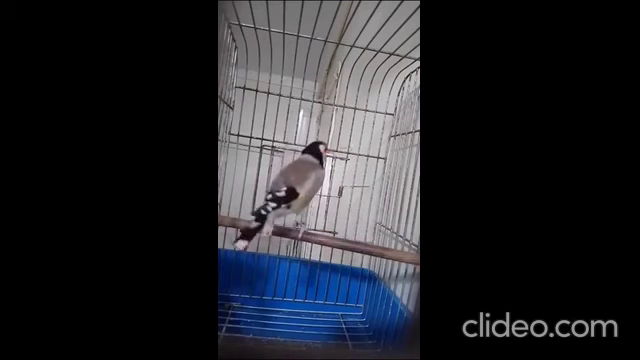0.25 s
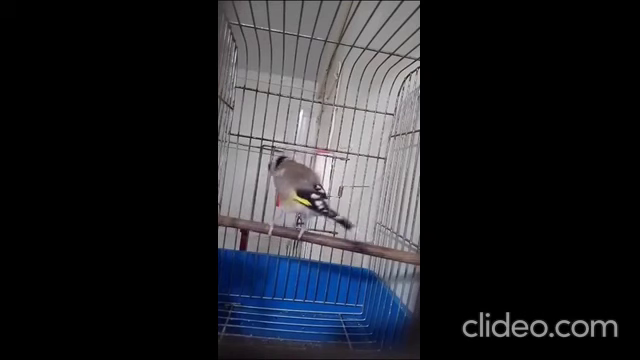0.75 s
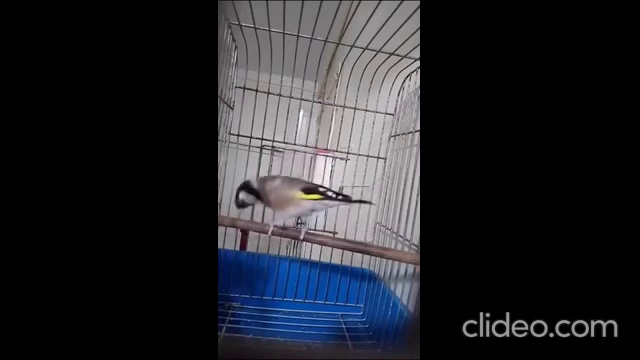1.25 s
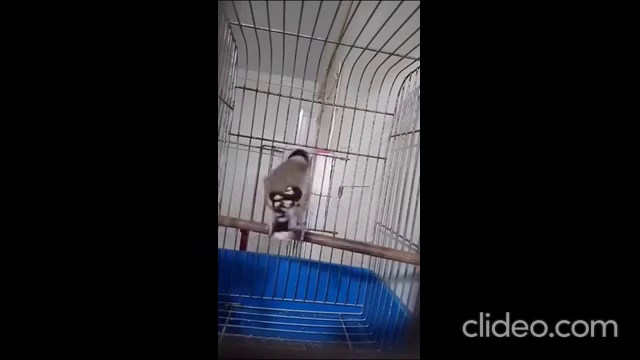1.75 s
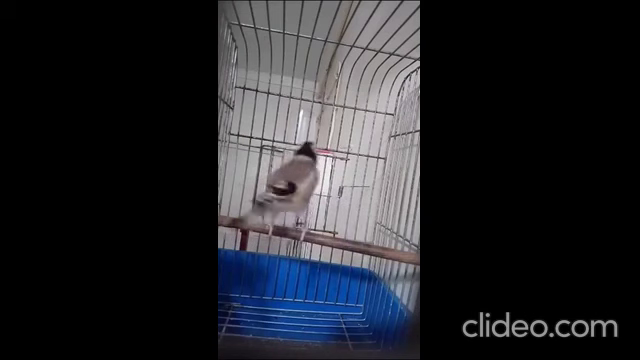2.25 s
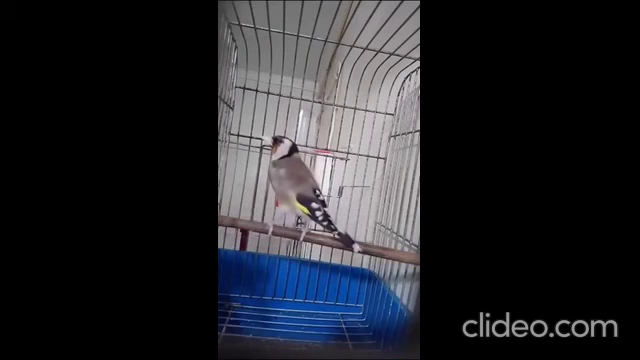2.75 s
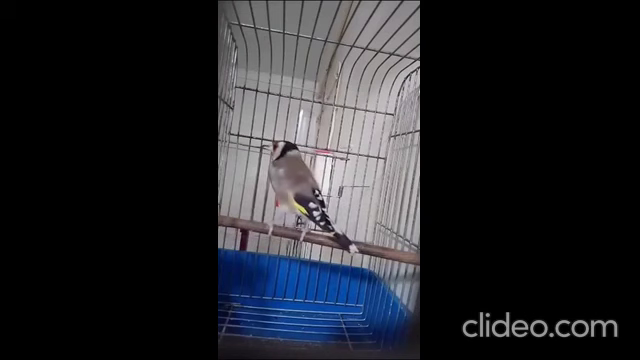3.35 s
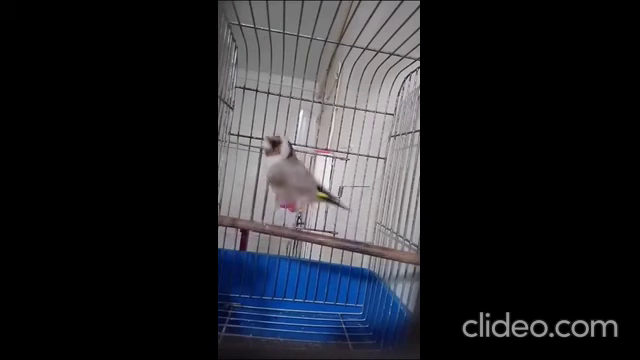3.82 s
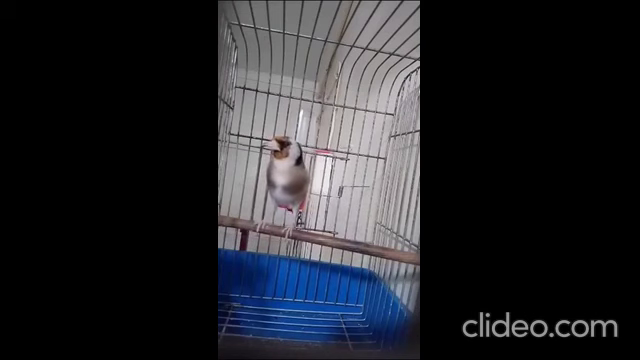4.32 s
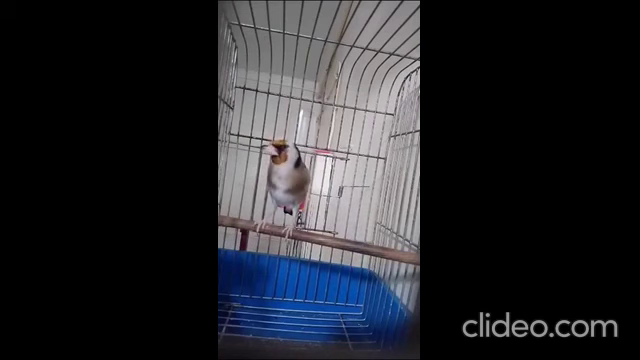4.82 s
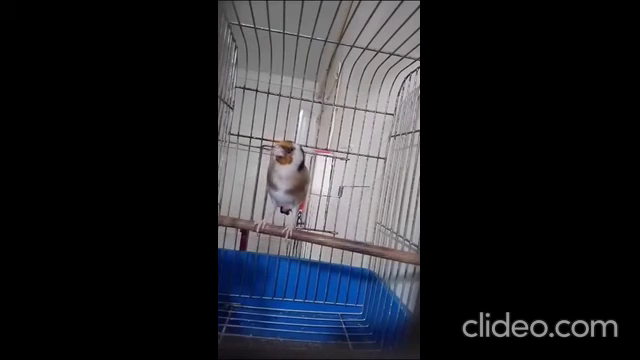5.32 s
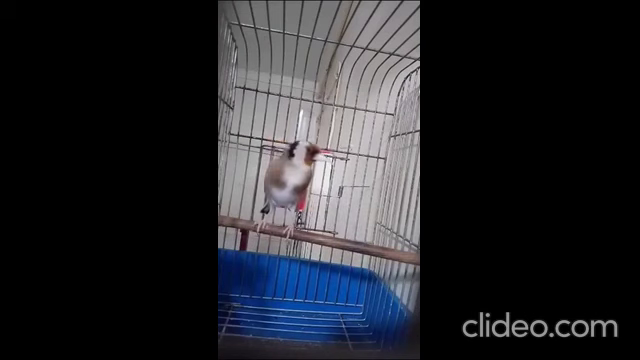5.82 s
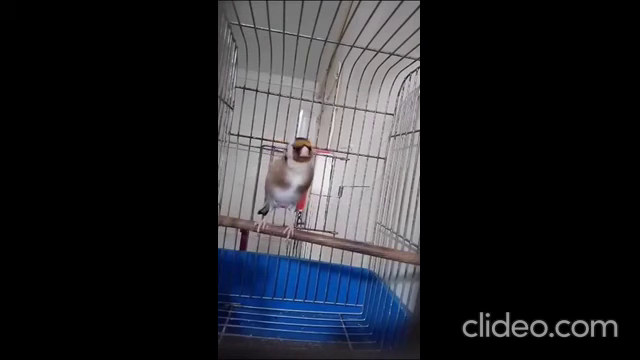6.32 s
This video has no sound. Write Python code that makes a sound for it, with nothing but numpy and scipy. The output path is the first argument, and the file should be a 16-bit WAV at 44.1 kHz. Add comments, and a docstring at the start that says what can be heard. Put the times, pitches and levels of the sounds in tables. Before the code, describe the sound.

A small caged songbird, close to the microphone, makes light taps on its perch and then gives a single short, piercing burst of song that rings in the room. A second finch further away twitters softly before it and more busily afterwards, washed in echo. The birds then fall quiet, leaving gentle rustles, faint dull bumps and a low indoor hum with a little hiss.

```python
"""Caged goldfinch in a bare room

Close to the microphone, a goldfinch sings a sharp phrase with both sides of its syrinx; the room rings.
Further off a second finch twitters softly, reaching the microphone mostly as echo.
The near bird taps its perch and shuffles, shaking the cage; soft rustles come and go over a faint hum."""
import sys
import numpy as np
from scipy import signal
from scipy.fft import rfft, irfft, next_fast_len
from scipy.io import wavfile
from scipy.ndimage import uniform_filter1d

SR = 44100
rng = np.random.default_rng(int(sys.argv[2]) if len(sys.argv) > 2 else 0)


def wrap_up_sound(samples):
    """Save the sound to the file named by the first command line argument, as 16-bit audio."""
    columns = np.atleast_2d(samples).T
    # keep every value between -1 and 1, then stretch to whole-number steps
    tamed = np.clip(columns, -1, 1)
    steps = np.round(tamed * 32767).astype(np.int16)
    wavfile.write(sys.argv[1], SR, steps)


N = 289737
LEAD = SR  # samples of run-up, so the room is already ringing at time 0
TIME = np.arange(-LEAD, N) / SR
ROOM_T60_S = 0.61

# near finch, each side of the syrinx, one list per syllable: (time [s], pitch [Hz], level [dB])
LOW_SYLLABLES = [
    [(2.035, 1845, -52), (2.068, 2270, -38.5), (2.086, 2500, -20.5), (2.095, 2580, -17.5),
     (2.115, 2816, -35.5), (2.15, 3106, -26), (2.185, 3395, -19), (2.196, 3550, -52)],
    [(2.458, 2656, -53), (2.47, 2430, -34), (2.485, 2178, -31.5), (2.494, 2090, -32), (2.5, 2040, -65)],
]
HIGH_SYLLABLES = [
    [(1.923, 5580, -31), (1.9255, 5070, -20.5), (1.928, 3410, -16.5), (1.9315, 4440, -17.5),
     (1.9375, 4892, -14), (1.943, 5080, -25.5)],
    [(2.136, 3340, -41.5), (2.143, 3560, -27), (2.16, 4040, -20), (2.195, 4595, -28.5)],
    [(2.228, 4028, -33), (2.24, 4337, -9), (2.247, 4614, -21), (2.283, 3890, -26), (2.303, 3619, -15),
     (2.325, 3513, -11.5), (2.345, 3484, -13), (2.37, 3509, -22), (2.45, 3537, -26.5), (2.465, 3530, -70)],
    [(2.468, 3557, -38), (2.487, 3393, -29.5), (2.497, 3210, -16), (2.506, 2955, -13), (2.516, 2635, -20),
     (2.528, 2290, -28)],
]
# each side's second harmonic against its fundamental, before colouring: (time [s], level [dB])
LOW_SECOND_HARMONIC = [(2.1, -26), (2.15, -21.5), (2.19, -35.5), (2.467, -7.5), (2.486, 5.5)]
HIGH_SECOND_HARMONIC = [(1.941, -37.5), (2.143, -8.5), (2.16, -33.5), (2.33, -54), (2.371, -10),
                        (2.45, -13.5), (2.496, -49), (2.52, -20.5)]
# tone colour of the near song's overtones and rasp, brightest near 6 kHz: (frequency [Hz], gain [dB])
OVERTONE_COLOUR = [(3500, -6.5), (5000, 4.5), (6000, 12.5), (7100, 2.5), (7800, -8.5), (9000, 1),
                   (10100, 4.5), (10850, 3.5), (11300, -3), (12600, -3), (14000, -14.5)]
# the phrase comes twice; the first ends just before the scene opens: (time shift [s])
PHRASE_OFFSETS_S = [-2.545, 0]
# brightness of each phrase: (overtone gain [dB])
PHRASE_BRIGHTNESS_DB = [3.5, 1]
# reflections off the cage tray and near walls: (delay [s], gain [dB])
NEAR_ECHOES = [(.0058, -13), (.0145, -14.5), (.031, -14.5)]

# far finch's trilled chirps, thin whistles and wide buzzes:
# (start [s], length [s], pitch [Hz], level [dB], glide [share of pitch])
FAR_CHIRPS = [(.39, 0.1, 3620, -50.5, .03), (.502, 0.19, 3746, -51.5, -0.049),
              (.97, 0.094, 3310, -55.5, 0.032), (1.112, 0.075, 3720, -51.5, 0.068),
              (1.837, 0.063, 3590, -50, .08), (3.049, 0.089, 2930, -55, .06),
              (3.183, 0.085, 3485, -45.5, 0.058), (3.536, .062, 3588, -37.5, 0.129),
              (3.572, 0.0666, 3963, -34, 0.05), (4.304, 0.057, 3463, -36.5, -0.205),
              (4.479, 0.062, 2980, -48.5, 0.013), (4.57, 0.071, 4050, -36, 0.059)]
FAR_WHISTLES = [(3.32, 0.053, 5980, -51.5, 0.0056), (3.419, 0.071, 5300, -46.5, -0.079),
                (3.421, 0.082, 4454, -45.5, -0.061), (3.673, 0.062, 6390, -50, -.03),
                (3.789, 0.089, 4835, -36.5, 0.083), (3.955, 0.051, 5980, -48, 0.024),
                (4.05, 0.22, 5990, -51, -0.058), (4.391, 0.065, 6490, -56, -0.086),
                (4.528, 0.084, 5175, -45.5, -0.0144)]
FAR_BUZZES = [(3.964, 0.16, 4160, -43.5, 0.0082), (4.125, 0.19, 4200, -43.5, -0.026),
              (4.436, 0.069, 4440, -44, 0.062)]

# claws and beak on the perch: (time [s], level [dB], relative click level [dB])
PERCH_TAPS = [(0.976, -46.5, 0.5), (1.119, -45, -6), (1.229, -45.5, -6), (1.321, -44.5, 3.5),
              (1.336, -44.5, -5), (3.773, -51, 13.5)]
# resonances of perch and wires: (frequency [Hz], level [dB], T60 [s])
WIRE_MODES = [(285, -12, .2), (329, -25, .2), (1284, 5.5, 0.056), (1434, -13, 0.072), (1543, 1, .06),
              (1750, 0.5, 0.063), (2010, -27, .05), (2670, 1, 0.066), (3100, -1, 0.037)]
# the bird's shifts of weight, rustling strokes, thuds, a scuff: (peak time [s], rise [s], level [dB])
SHUFFLE_SWELLS = [(.85, 0.071, -54.5), (1.06, 0.12, -48), (1.27, 0.097, -48), (3.785, 0.023, -42)]
RUSTLE_SWELLS = [(1.04, 0.039, -56), (1.33, 0.06, -63), (1.53, 0.054, -62), (1.74, .05, -68),
                 (3.06, 0.069, -57.5), (3.44, 0.11, -55.5), (3.7, 0.077, -52.5), (4.21, 0.14, -50.5),
                 (4.43, 0.11, -56), (4.73, 0.079, -56.5), (5.54, 0.19, -55), (5.68, 0.17, -58.5),
                 (5.99, 0.018, -47), (6.18, 0.05, -57), (6.52, 0.02, -53)]
THUD_SWELLS = [(5.08, 0.031, -65), (5.29, 0.02, -54), (5.4, 0.043, -55)]
SCUFF_SWELLS = [(6.56, 0.046, -48.5)]
# spectra of the cage tray, small movements and room tone: (frequency [Hz], relative density [dB])
TRAY_SPECTRUM = [(150, -34.5), (220, -17.5), (280, -4.5), (335, -1.5), (420, -13), (600, -25.5),
                 (1300, -19), (2500, -74.5)]
RUSTLE_SPECTRUM = [(300, -7.5), (700, -9), (1200, -3), (1800, 1), (2400, 4.5), (3200, -1), (6500, -12),
                   (8500, -8.5), (10000, -12.5), (11000, -18), (14000, -23)]
THUD_SPECTRUM = [(80, -30), (140, -7), (200, 3), (260, 0), (400, -43)]
SCUFF_SPECTRUM = [(250, -27), (450, 5), (700, 2), (1400, -2.5), (2500, -22)]
AIR_SPECTRUM = [(15, -47.5), (25, -21.5), (38, -20), (80, -4.5), (141, -16.5), (168, -20), (204, -8),
                (313, -0.5), (403, -7), (435, -7), (470, -10), (518, -9.5), (1080, -13), (1510, -5),
                (2600, -15), (3380, -43.5), (5720, -120)]
HISS_SPECTRUM = [(2000, -29), (2600, 8), (3200, 3.5), (4200, -6), (6000, -18.5), (9500, -24),
                 (11000, -28.5), (14000, -43)]
# tones of the room's hum: (frequency [Hz], early level [dB], late level [dB])
HUM_TONES = [(70.6, -77, -66), (88.6, -72, -77), (132, -76.5, -84), (315, -72.5, -65), (924, -70.5, -77)]


def near_finch(coupling_db=2, beamed_db=-8, scatter_db=-13, room_db=-4, rasp_db=-43, clash_db=-9):
    """Close up, two voices in one throat: overlapping, they modulate into a sum tone and a rasp."""
    low, low_overtones = syrinx_side(LOW_SYLLABLES, LOW_SECOND_HARMONIC, third_db=-34)
    high, high_overtones = syrinx_side(HIGH_SYLLABLES, HIGH_SECOND_HARMONIC, third_db=-45)
    tone = low + high
    # the short windpipe and beak radiate only the upper mixing tone
    sum_tone = signal.sosfilt(signal.butter(4, 4500, "high", fs=SR, output="sos"), low * high)
    # turbulence at the labia spreads a faint rasp around the tones, most when both sides clash
    rasp = undb(rasp_db) * tone * noise([(300, -6), (2500, -3.5), (6000, -6.5), (9000, -13)])
    clash = sum_tone * noise([(100, -5), (700, 1.5), (2000, -8), (6000, -16.5), (9000, -43)])
    rasp += undb(clash_db) * clash
    overtones = low_overtones + high_overtones + undb(coupling_db) * sum_tone
    bright = colour(overtones + rasp, OVERTONE_COLOUR)
    # the overtones are beamed past the microphone and arrive mostly by way of the room
    direct = phrases(tone, undb(beamed_db) * bright)
    radiated = phrases(tone, bright)
    echoes = sum(undb(db) * np.roll(direct, int(delay * SR)) for delay, db in NEAR_ECHOES)
    scatter = reverb(radiated, t60_s=0.22, build_s=0.004)  # bars and nearby furniture
    room = reverb(radiated, ROOM_T60_S, build_s=0.0044, treble_share=0.86)
    return direct + echoes + undb(scatter_db) * scatter + undb(room_db) * room


def syrinx_side(syllables, second_harmonic, third_db, jitter=0.0038, onset_s=0.0015):
    """One pair of labia vibrates in a gliding, nearly pure tone; returns fundamental and overtones."""
    tone, overtones = np.zeros((2, len(TIME)))
    waver = 1 + jitter * walk(500)
    for rows in syllables:
        start, end = rows[0][0], rows[-1][0]
        on = (TIME >= start) & (TIME <= end)
        t = TIME[on]
        hz, db = curves(rows, t)
        second_db, = curves(second_harmonic, t)
        phase = 2 * np.pi * np.cumsum(hz * waver[on]) / SR
        # the oscillation needs a moment to start and stop
        gate = np.sin(np.pi / 2 * np.clip(np.minimum(t - start, end - t) / onset_s, 0, 1)) ** 2
        pressure = np.sqrt(2) * gate * uniform_filter1d(undb(db), size=64)
        harmonics = undb(second_db) * np.sin(2 * phase) + undb(third_db) * np.sin(3 * phase)
        tone[on] += pressure * np.sin(phase)
        overtones[on] += pressure * harmonics
    return tone, overtones


def phrases(tone, overtones):
    """The near bird sings its phrase twice, a little brighter the first time."""
    return sum(np.roll(tone + undb(db) * overtones, int(s * SR))
               for s, db in zip(PHRASE_OFFSETS_S, PHRASE_BRIGHTNESS_DB))


def far_finch(direct_db=-8, room_db=-1, trill_hz=105.1, motif_from_s=4.35, motif_period_s=0.284):
    """Further off, short slurs with an uneven trill, washed out by the room; the last motif repeats."""
    song = np.zeros(len(TIME))
    trill_phase = 2 * np.pi * np.cumsum(trill_hz * (1 + 0.2 * walk(40))) / SR
    trill = np.sin(trill_phase) * (1 + 0.39 * walk(150))
    for notes, trill_depth in (FAR_CHIRPS, 0.077), (FAR_WHISTLES, 0.014), (FAR_BUZZES, 0.14):
        for first_s, length_s, pitch_hz, db, glide in notes:
            starts = [first_s, first_s + motif_period_s] if first_s > motif_from_s else [first_s]
            for s in starts:
                size, start = int(length_s * SR), LEAD + int(s * SR)
                bend = glide * np.linspace(-0.5, 0.5, size) + trill_depth * trill[start:start + size]
                phase = 2 * np.pi * np.cumsum(pitch_hz * (1 + bend)) / SR
                envelope = np.sqrt(2) * undb(db) * signal.windows.tukey(size, 0.5)
                add(song, s, envelope * np.sin(phase))
    return undb(direct_db) * song + undb(room_db) * reverb(song, 0.94, build_s=0.0089, treble_share=0.83)


def perch(click_s=0.013, contact_s=0.002, room_db=-2):
    """In the near cage, taps ring the perch and wires; shifting feet set the plastic tray rumbling."""
    taps, t = np.zeros(len(TIME)), np.arange(SR // 4) / SR
    scratch = noise([(300, -32), (800, -11.5), (1500, -3), (3000, -0.5), (6000, -18), (13000, -33)])
    attack = 1 - np.exp(-t / contact_s)
    for s, db, click_db in PERCH_TAPS:
        strengths = 1 + 0.5 * rng.standard_normal(len(WIRE_MODES))
        ring = sum(strength * undb(mode_db) * np.sin(2 * np.pi * hz * t) * undb(-60 * t / t60)
                   for strength, (hz, mode_db, t60) in zip(strengths, WIRE_MODES))
        click = np.roll(scratch, -int(s * SR))[:len(t)] * np.exp(-t / click_s)
        add(taps, s, undb(db) * attack * (ring + undb(click_db) * click))
    rumble = noise(TRAY_SPECTRUM) * swells(SHUFFLE_SWELLS, decay_s=0.16) * undb(2 * walk(35))
    return taps + undb(room_db) * reverb(taps, ROOM_T60_S, build_s=0.0031) + rumble


def rustle(grain_db=1.5, floor_db=-69, flutter_db=2.9):
    """Soft surfaces brush in strokes, never quite still: countless tiny slips of uneven size."""
    slips = rng.standard_normal(len(TIME)) * undb(grain_db * walk(900))
    strength = np.hypot(swells(RUSTLE_SWELLS, decay_s=0.15), undb(floor_db))
    return unit(colour(slips, RUSTLE_SPECTRUM)) * strength * undb(flutter_db * walk(30))


def bumps():
    """Three faint, dull thuds and a scuff in the background."""
    thuds = noise(THUD_SPECTRUM) * swells(THUD_SWELLS, decay_s=0.023)
    scuff = noise(SCUFF_SPECTRUM) * swells(SCUFF_SWELLS, decay_s=0.08)
    return thuds + scuff


def room_tone(air_db=-52.5, hiss_db=-59, shift_s=4.88, shift_width_s=0.37):
    """Still indoor air, a faint hiss and a wavering hum whose balance shifts late in the scene."""
    air = noise(AIR_SPECTRUM) * undb(air_db + 0.5 * walk(2.1))
    late = (1 + np.tanh((TIME - shift_s) / shift_width_s)) / 2
    hum = 0
    for hz, early_db, late_db in HUM_TONES:
        db = early_db + late * (late_db - early_db) + 1.2 * walk(1.7)
        phase = 2 * np.pi * np.cumsum(hz + 0.8 * walk(3.4)) / SR
        hum += np.sqrt(2) * undb(db) * np.sin(phase)
    return air + undb(hiss_db) * noise(HISS_SPECTRUM) + hum


def reverb(x, t60_s, build_s, treble_share=0.75, split_hz=4800):
    """Diffuse room sound builds up as reflections multiply, then dies away, the treble first."""
    t, hiss = np.arange(SR) / SR, rng.standard_normal(SR)
    body = signal.sosfiltfilt(signal.butter(4, split_hz, fs=SR, output="sos"), hiss)
    fade = undb(-60 * t / t60_s)
    tail = (body * fade + (hiss - body) * fade ** (1 / treble_share)) * (1 - np.exp(-t / build_s))
    return signal.fftconvolve(x, unit(tail) / np.sqrt(SR))[:len(x)]


def swells(rows, decay_s):
    """Envelope of soft movements: each swells to its peak, then dies away; their powers add."""
    power = 0
    for s, rise_s, db in rows:
        before, after = np.minimum(TIME - s, 0), np.maximum(TIME - s, 0)
        power += (undb(db) * np.exp(-(before / rise_s) ** 2 - after / decay_s)) ** 2
    return np.sqrt(power)


def undb(db):
    """Decibels to gain."""
    return 10 ** (np.asarray(db) / 20)


def unit(x):
    """Scale to rms 1."""
    return x / np.sqrt(np.mean(x ** 2))


def curves(rows, t):
    """Each column after the time column, joined by straight lines and read at times t."""
    s, *columns = np.transpose(rows)
    return [np.interp(t, s, column) for column in columns]


def walk(rate_hz):
    """Random wander with rms 1."""
    knots = np.arange(TIME[0], TIME[-1] + 1, 1 / rate_hz)
    return unit(np.interp(TIME, knots, rng.standard_normal(len(knots))))


def colour(x, points):
    """Filter a sound by points of (frequency [Hz], gain [dB])."""
    hz, db = np.transpose(points)
    size = next_fast_len(len(x))
    bins_hz = np.maximum(np.arange(size // 2 + 1) * SR / size, 1)
    gain = undb(np.interp(np.log(bins_hz), np.log(hz), db))
    return irfft(rfft(x, size) * gain, size)[:len(x)]


def noise(points):
    """Coloured noise with rms 1."""
    return unit(colour(rng.standard_normal(len(TIME)), points))


def add(track, s, sound):
    """Mix a sound into a track at time s."""
    start = LEAD + int(s * SR)
    part = sound[:len(track) - start]
    track[start:start + len(part)] += part


def scene():
    """Both birds, the cage and the room at one microphone."""
    return (near_finch() + far_finch() + perch() + rustle() + room_tone() + bumps())[None, LEAD:]


def record(dry):
    """The phone by the cage cuts the treble above 13.9 kHz."""
    return signal.sosfilt(signal.ellip(8, 0.2, 70, 13900, fs=SR, output="sos"), dry)


dry = scene()
out = record(dry)
wrap_up_sound(out)
```